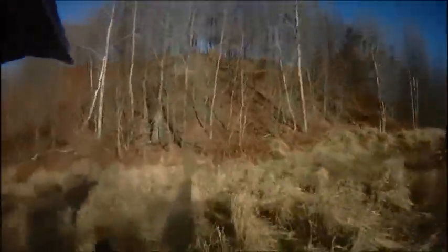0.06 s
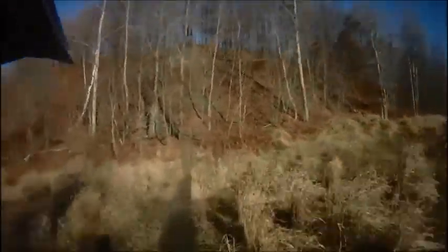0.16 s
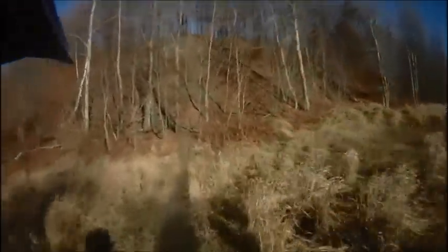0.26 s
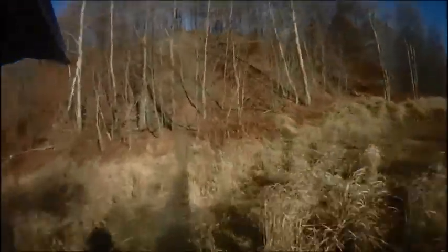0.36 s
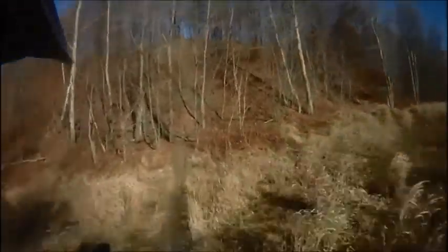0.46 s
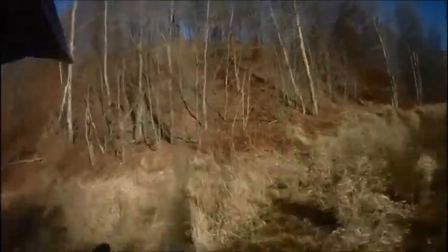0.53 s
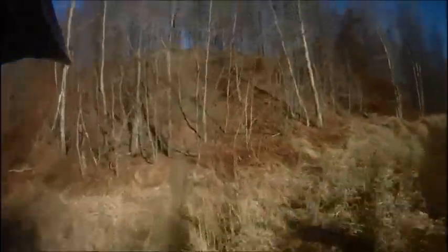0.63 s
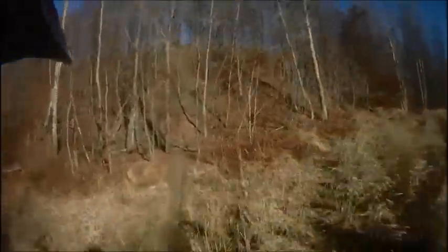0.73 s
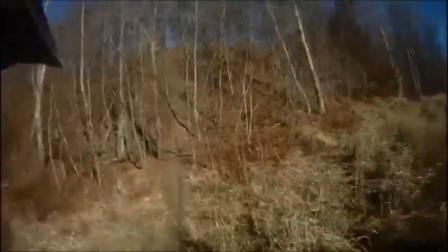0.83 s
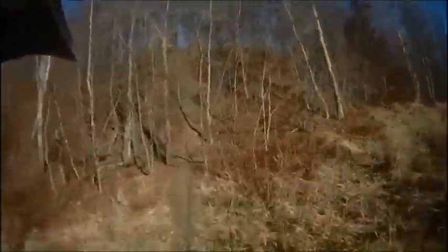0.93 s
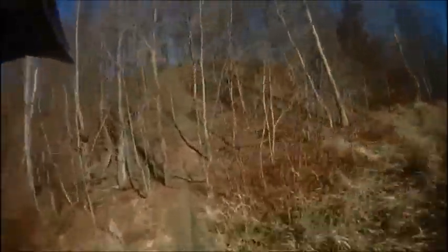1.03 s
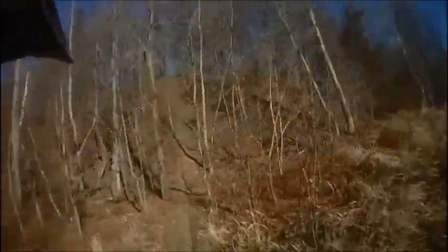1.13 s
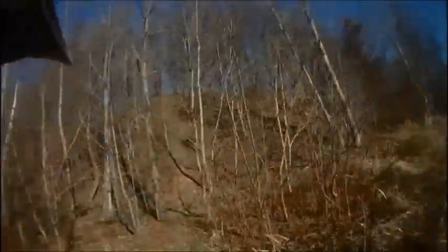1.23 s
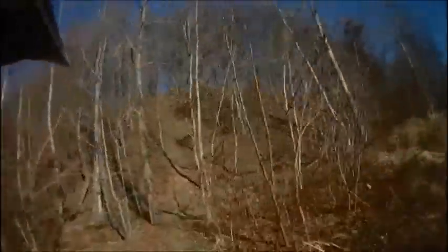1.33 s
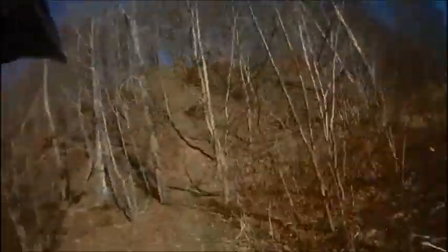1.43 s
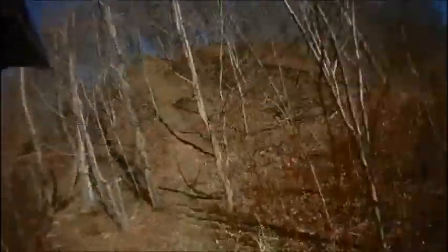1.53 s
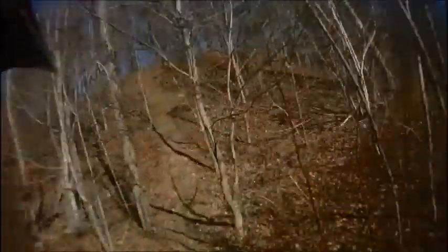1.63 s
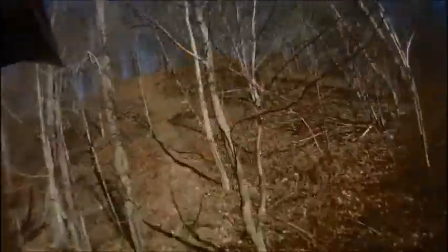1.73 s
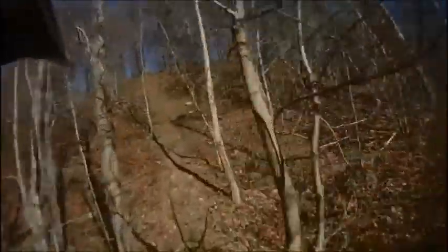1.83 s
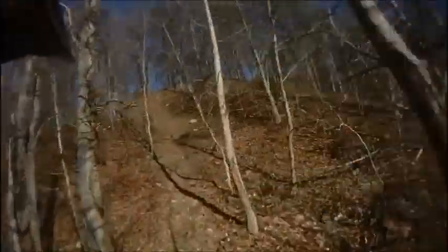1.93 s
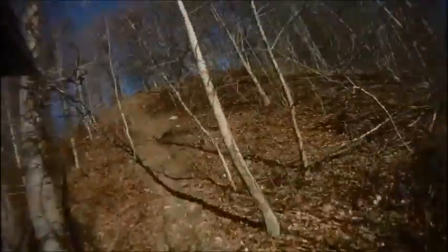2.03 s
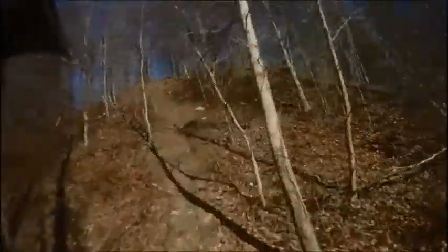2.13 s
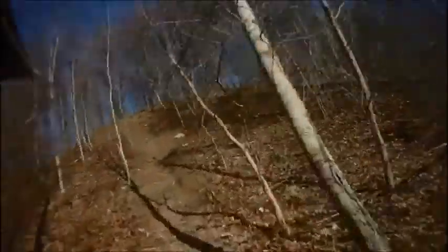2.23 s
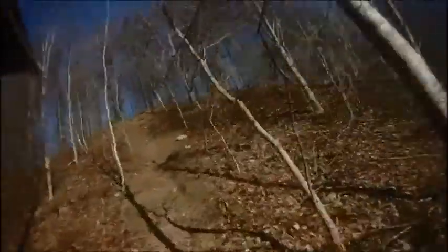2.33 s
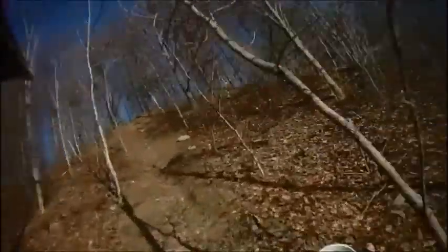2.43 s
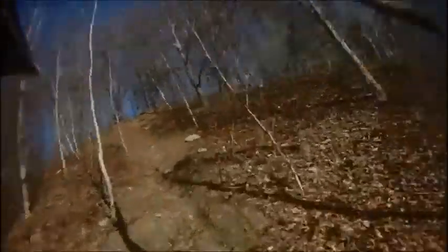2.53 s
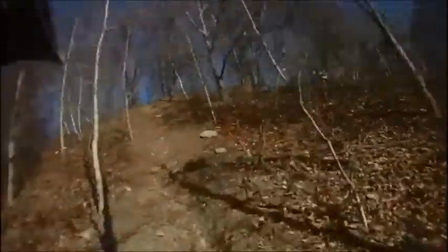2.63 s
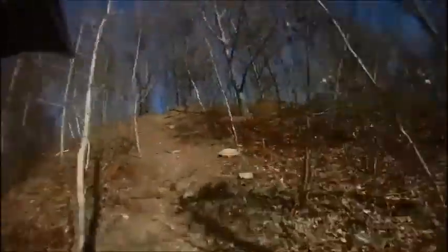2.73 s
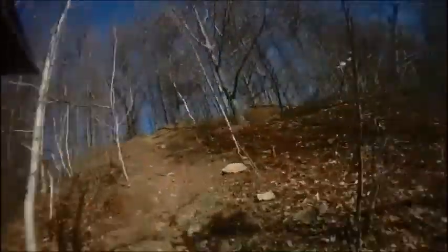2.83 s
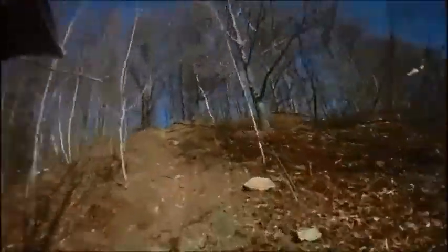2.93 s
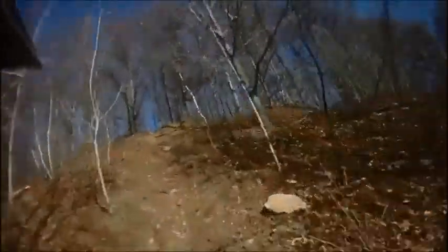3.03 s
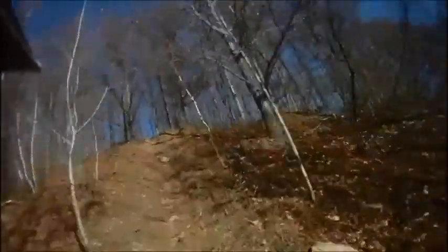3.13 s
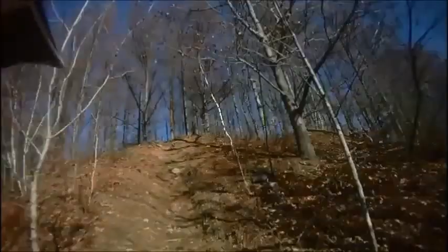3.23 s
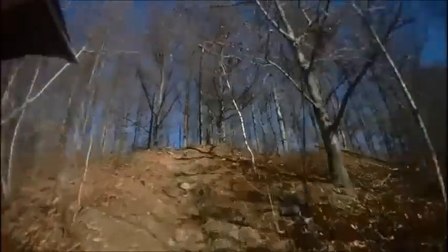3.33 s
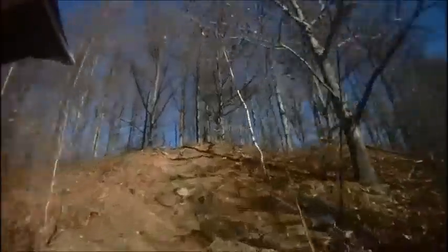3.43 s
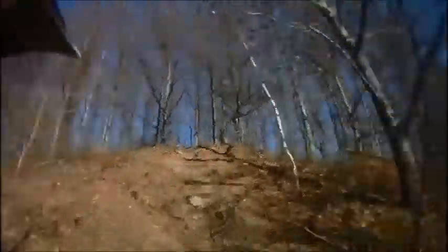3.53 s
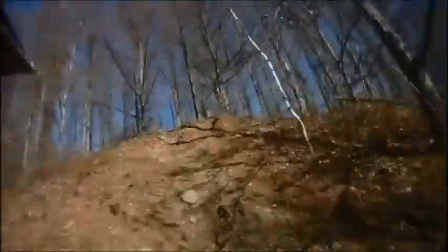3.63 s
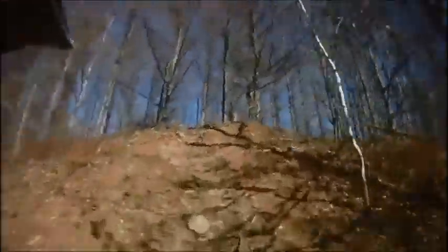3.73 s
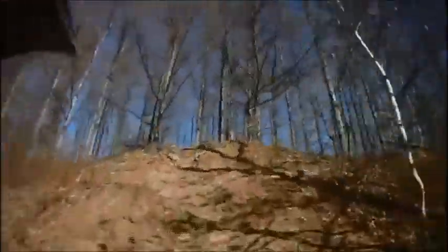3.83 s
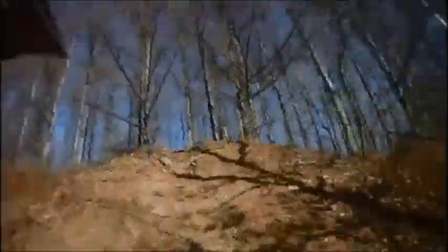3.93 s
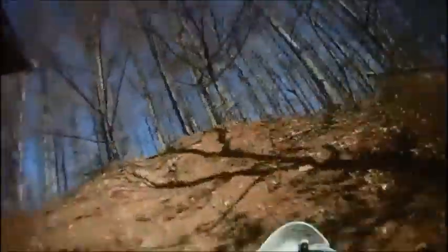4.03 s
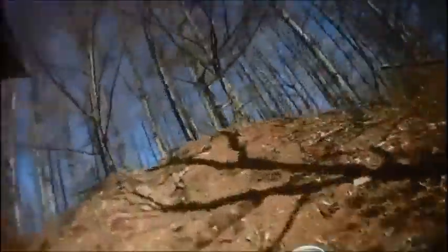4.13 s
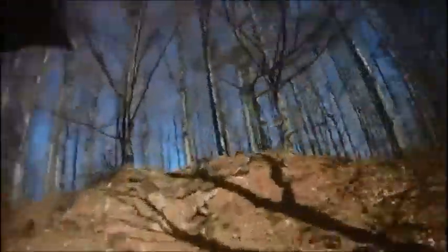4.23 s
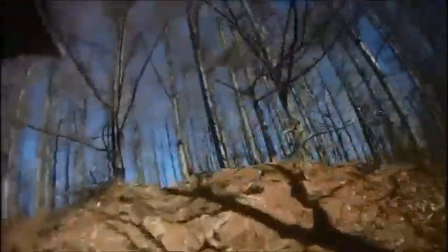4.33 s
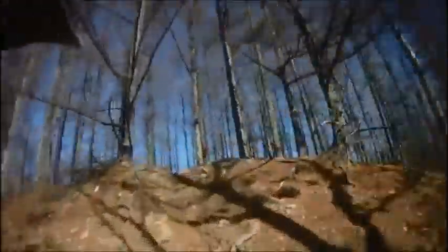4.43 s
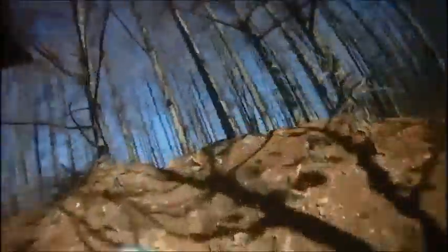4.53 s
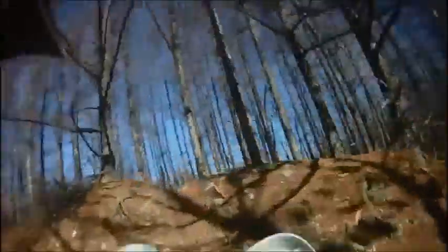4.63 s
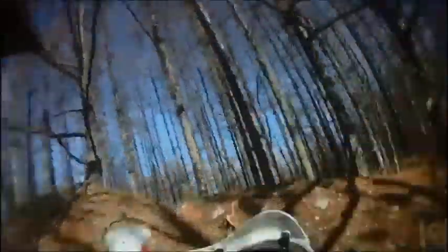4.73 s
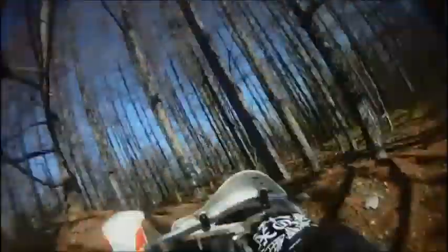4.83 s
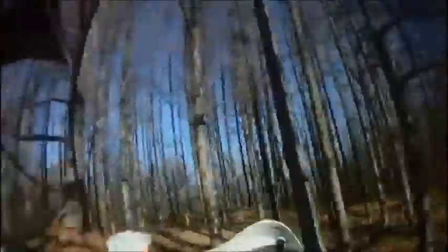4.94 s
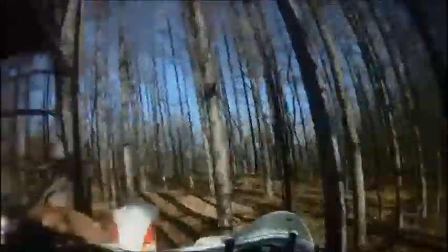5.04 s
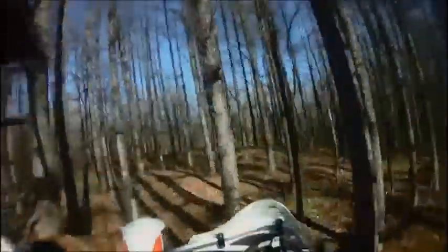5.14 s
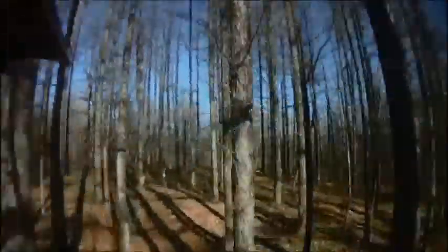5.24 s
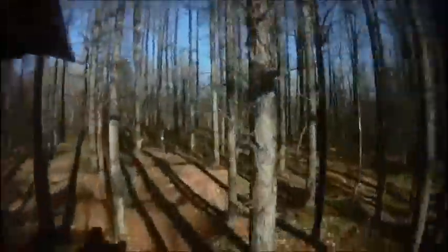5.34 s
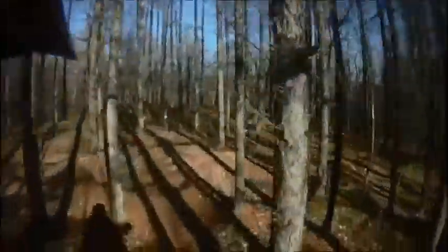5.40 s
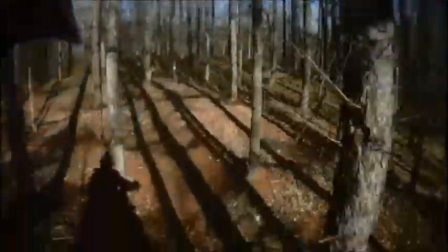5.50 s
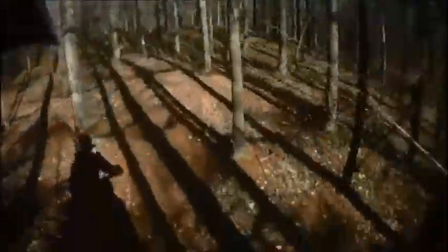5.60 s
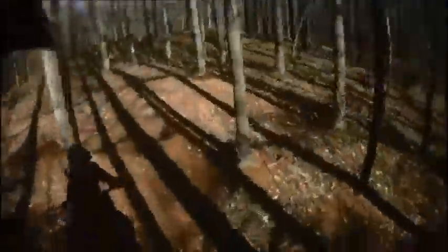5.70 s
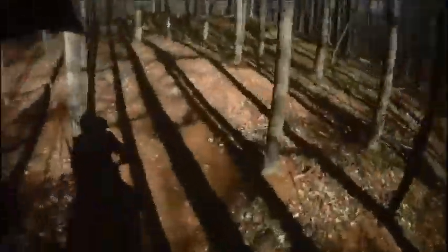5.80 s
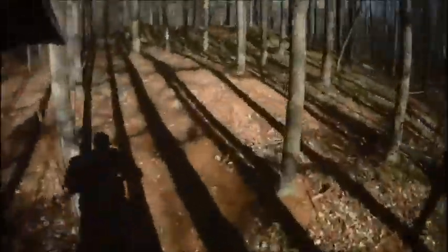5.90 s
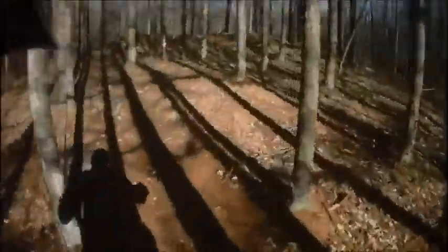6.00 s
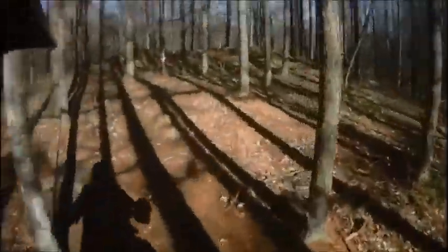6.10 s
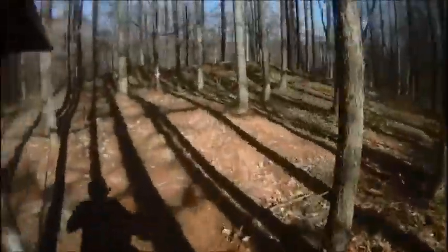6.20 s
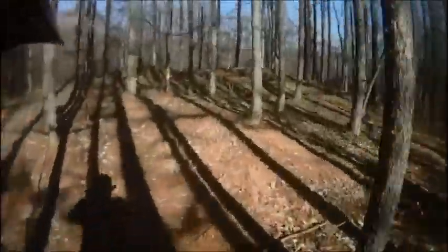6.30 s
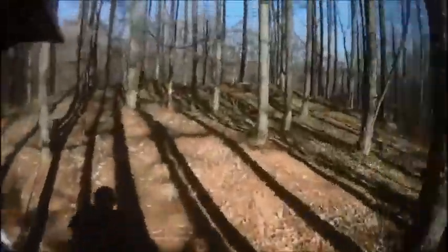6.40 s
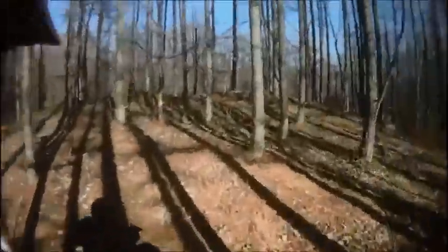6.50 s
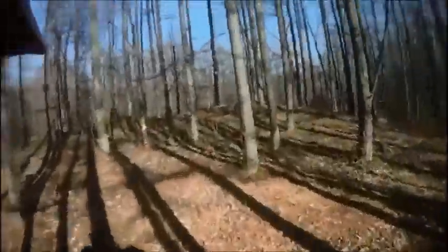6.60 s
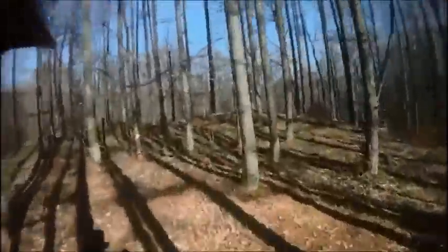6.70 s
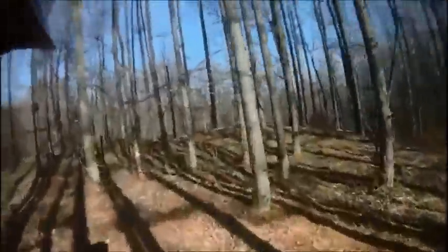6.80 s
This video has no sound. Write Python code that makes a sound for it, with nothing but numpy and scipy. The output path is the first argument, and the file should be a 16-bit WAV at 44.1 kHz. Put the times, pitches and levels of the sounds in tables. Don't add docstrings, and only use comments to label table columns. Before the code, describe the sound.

A small two-stroke trail bike barks and surges up a wooded hill, sputtering off throttle, then drops to a lumpy idle with sharp ticks.

```python
import sys
import numpy as np
from scipy import signal
from scipy.fft import rfft, irfft
from scipy.io import wavfile
from scipy.ndimage import uniform_filter1d

SR = 44100
rng = np.random.default_rng(int(sys.argv[2]) if len(sys.argv) > 2 else 0)


def convert_level_to_amplitude(level_db):
    exponent = np.asarray(level_db, float) / 20
    return 10 ** exponent


def master_out(mix):
    frames = np.transpose(np.atleast_2d(mix))
    ceiling = np.clip(frames, -1, 1)
    pcm = np.round(ceiling * 32767).astype(np.int16)
    wavfile.write(sys.argv[1], SR, pcm)


N = 302522

STALL_S = 4.92
STEADY_MISFIRE = .18

# time_s, effort_db, load_db, pipe_hz, ground_echo_share
THROTTLE = [(0, -21.5, -29.5, 617, 0.93), (.25, -16.5, -31, 510, 0.45), (.56, -15, -29.5, 525, 0.52),
            (.7, -23.5, -26.5, 503, 0.25), (1.0, -16.5, -18, 520, 0.48), (1.18, -18, -26.5, 526, 0.56),
            (1.27, -20, -22.5, 480, 0.41), (1.5, -16.5, -21, 535, 0.41), (1.8, -19, -20.5, 530, 0.43),
            (2.25, -16, -19.5, 507, 0.25), (2.45, -16, -18.5, 547, 0.058), (2.68, -18, -22.5, 482, 0.25),
            (2.88, -16.5, -23.5, 568, 0.054), (3.3, -18, -23, 490, 0.13), (3.72, -14.5, -31, 488, 0.46),
            (4.08, -14.5, -29, 524, 0.3), (4.35, -15.5, -32.5, 490, 0.47), (4.9, -19, -28.5, 567, 0.47)]
SURE_FIRINGS_S = [.918, 1.17, 1.9555, 2.071, 3.6, 4.311, 4.589]
PIPE_SAG_HZ = 35.6


def pulling():
    hz, surge, push = revs()
    pipe_semitones, bite_db, boom_db, hollow_db, hollow_semitones, edge_db, port_semitones, port_db = push
    ragged = misfire()
    effort_db, load_db, pipe_hz, ground = columns(THROTTLE)
    pipe_hz = pipe_hz * 2 ** (pipe_semitones / 12) - PIPE_SAG_HZ * surge
    can_db, bark_db, knock_db, crack_db = engine_levels(effort_db, load_db, hz, surge, bite_db, boom_db, ragged)
    shut = 1 - .55 * ragged
    pulses, turns, strength = firings(hz, 0.2 + 2.4 * ragged, SURE_FIRINGS_S)
    bounce = np.clip(ground, 0, .6) * np.roll(pulses, round(0.004364 * SR))
    puff = 1.15 * puffs(turns, strength, .8, 1.0)
    near = -jittered(pulses, spread_s=.00004)
    low = exhaust(pulses + bounce, puff, ragged, shut, pipe_hz, can_db, bark_db)
    low += (convert_level_to_amplitude(hollow_db) - 1) * resonate(low, 341 * 2 ** (hollow_semitones / 12), 167)
    low += (convert_level_to_amplitude(edge_db) - 1) * resonate(low, np.full(N, 860), 170)
    low = np.roll(low, round(.0042 * SR))
    knock = port_edge(near, turns, strength, ragged, knock_db, port_semitones, port_db)
    crack = fins(near, turns, strength, ragged, shut, crack_db)
    on = np.clip((STALL_S - np.arange(N) / SR) / 0.039, 0, 1) ** 1.1
    return on * (low + knock + crack)


# freq_hz, level_db
CAN = [(41, -35), (70, -29), (102, -22), (167, -15), (220, 0.5), (236, 5.5), (310, 4), (400, -53.5),
       (680, -120)]
# freq_hz, level_db
BARK = [(180, -27.5), (300, 0), (344, 17.5), (382, 12.5), (460, 16.5), (499, 14), (566, 19), (700, 9.5),
        (877, 0.5), (1000, -36.5), (1300, -22), (2200, -120)]


def exhaust(pulses, puff, ragged, shut, pipe_hz, can_db, bark_db):
    clean = np.sqrt(1 - ragged ** 2)
    can = clean * colour(pulses, CAN) + ragged * colour(puff, CAN)
    bark = clean * colour(-pulses, BARK, lean=-.9) + ragged * colour(puff, BARK)
    bark = levelled(0.9 * bark + resonate(resonate(bark, pipe_hz, 164), pipe_hz, 162))
    bark = levelled(scattered(bark, .04, share=.3))
    return convert_level_to_amplitude(can_db) * can + convert_level_to_amplitude(bark_db) * bark * shut


# freq_hz, level_db
KNOCK = [(500, -8), (850, 4.5), (885, -2), (947, 7), (1050, 4.5), (1220, 3), (1520, 6.5), (1640, 2.5),
         (1900, -2), (2470, 0), (4180, -120)]


def port_edge(near, turns, strength, ragged, knock_db, port_semitones, port_db):
    clean = np.sqrt(1 - ragged ** 2)
    echo = np.roll(near, round(0.00247 * SR))
    knock = clean * levelled(colour(scattered(near + 0.1 * echo, 0.04, .8), KNOCK))
    header_hz = 1015 * 2 ** (port_semitones / 12)
    knock += convert_level_to_amplitude(port_db) * .8 * resonate(knock, header_hz, 230)
    knock *= .7 * np.clip((knock_db + 46) / 16, .3, 1)
    breath = .3 + .4 * ragged + .012 * np.maximum(-28 - knock_db, 0)
    knock += breath * colour(puffs(turns, strength, .6, 2.5), KNOCK)
    return convert_level_to_amplitude(knock_db) * knock


# freq_hz, level_db
CRACK = [(1000, -121), (1700, 7.5), (1960, 12), (2270, 16), (3430, 12.5), (3850, 13.5), (5200, -6),
         (6760, -41), (11400, -120)]
# freq_hz, level_db
FIZZ = [(2650, -32.5), (4500, 1), (4910, -5.5), (5280, -5.5), (6360, -2.5), (6740, -6), (7710, -10.5),
        (8460, -6.5), (9780, -16.5), (11200, -13.5), (12400, -21), (14700, -21.5), (15500, -26)]


def fins(near, turns, strength, ragged, shut, crack_db):
    clean = np.sqrt(1 - ragged ** 2)
    load = np.clip((crack_db + 42) / 18, .15, 1)
    crack = .9 * load * clean * levelled(colour(scattered(near, .04, 1.5), CRACK))
    crack += .66 * shut * colour(puffs(turns, strength, 1.6 - .8 * load + ragged, 5.0), CRACK)
    fizz = shut * colour(puffs(turns, strength, 0.59 + 0.5 * ragged, 8.8), FIZZ)
    fizz_db = 1.376 * crack_db + 0.5
    return convert_level_to_amplitude(crack_db) * crack + convert_level_to_amplitude(fizz_db) * fizz


# start_s, from_hz, end_s, to_hz
PUSHES = [(0, 78.3, .53, 94), (.6, 102.6, .66, 105.2), (.73, 103.6, .86, 89), (.925, 89.5, 1.035, 105),
          (1.15, 90.5, 1.27, 109.5), (1.36, 119, 1.425, 116), (1.51, 102.5, 1.7, 109.5),
          (1.765, 110, 1.835, 120.3), (1.945, 122.3, 2.005, 117), (2.085, 102, 2.2, 116),
          (2.3, 118, 2.38, 117.5), (2.45, 108.5, 2.495, 117.5), (2.545, 110, 2.64, 115),
          (2.775, 130, 2.81, 130.5), (2.86, 115.3, 3.09, 113), (3.145, 104.5, 3.22, 115.5),
          (3.31, 118.5, 3.4, 137), (3.49, 110.8, 3.58, 103.5), (3.705, 88, 3.85, 104),
          (3.922, 94.5, 3.976, 105.5), (4.02, 95, 4.175, 81), (4.315, 92.5, 4.405, 105.6),
          (4.495, 95.6, 4.555, 74), (4.64, 95, 4.725, 74.5)]
PIPE_SEMITONES = [(1, 2.5), (2, 1), (0.5, 4), (3.2, 0), (0, 1.2), (1, 2), (-0.8, 1.8), (1, 0.1), (1, 0.5),
                  (0.6, 0.3), (-0.7, 2.5), (-2, 5), (0.5, 1.5), (3, -1), (0.8, 0), (.3, 2), (4, 2),
                  (1.5, 1.9), (2.5, 3), (1.9, 1.5), (2, 2), (0, 3.5), (3, -1.5), (2.5, 0.4)]
BITE_DB = [3.1, 2.5, 1, -6, 0, -1.6, -2.5, -2.5, -3.1, -2.5, -4, -3, -1, -4, -0.5, -1.5, -4, 3, 1.5, 2.5,
           1.5, 5, 2, 2.1]
BOOM_DB = [8, 0, 4, 0, -3.5, -7, 0.1, -6.5, -5.5, -3.5, -6.5, -0.5, -5.5, -5, -5, 0, -2.5, -6.5, 2, -4.5, 8,
           2.5, 5, 9]
HOLLOW_DB = [-3.5, 0, 2.5, -4.5, 5.5, 0.5, -4.5, 3, -4, -6.5, -0.5, -2.5, 0.5, -5, -2.5, -8, -21, 2, -8, -7,
             -6, -6, 3.5, 0]
HOLLOW_SEMITONES = [0.076, 0.12, 0, 0.12, 0.51, 0.13, 0, 0, 0.22, 1, 0, 0, 0, 0.3, 0, 0, 0, 0.18, 1.4, 2,
                    2.1, 0, 0.25, 0.48]
EDGE_DB = [-8, 0, 7, 0.5, -1, -17, 5.5, -2, 0, 1, -10, -7, 2.5, 0, 4.5, 8.5, -8, 1, -1.5, -3, 0, -4, 5, 3.5]
PORT_SEMITONES = [0.3, -0.31, 0.091, 0, -0.6, 0.8, 0, -0.52, -0.23, 0, 0.96, 0.058, 0.41, 0.33, 0.076,
                  -0.14, 0.21, 0, 0.15, 0.079, 0, 0.5, 0.13, 0.1]
PORT_DB = [-4, 8, -10, -8, 8.5, 4, -1.5, 8.5, 1.5, 3, 7, -4, 1, 9, -11, 1.5, 9, -2, 3, -2, -1, 6, -1, -13]
LAST_S, LAST_HZ, STALL_HZ = 4.82, 82, 68
SURGE_HZ_PER_S = 150
FLUTTER = .004


def revs():
    colours = np.transpose([BITE_DB, BOOM_DB, HOLLOW_DB, HOLLOW_SEMITONES, EDGE_DB, PORT_SEMITONES, PORT_DB])
    rows = []
    for (start_s, from_hz, end_s, to_hz), (from_st, to_st), shade in zip(PUSHES, PIPE_SEMITONES, colours):
        rows.append((start_s, from_hz, from_st, *shade))
        rows.append((end_s, to_hz, to_st, *shade))
    plain = np.zeros(len(rows[0]) - 2)
    rows += [(LAST_S, LAST_HZ, *plain), (STALL_S, STALL_HZ, *plain)]
    hz, *push = columns(rows)
    hz = uniform_filter1d(hz, size=1000)
    surge = np.tanh(uniform_filter1d(np.gradient(hz) * SR, size=1500) / SURGE_HZ_PER_S)
    shake = uniform_filter1d(uniform_filter1d(rng.standard_normal(N), size=1200), size=1200)
    flutter = evened(shake - uniform_filter1d(shake, size=6000))
    return hz * (1 + FLUTTER * flutter), surge, push


# start_s, end_s, misfire_0_to_1
MISFIRE = [
    (.73, .914, .85),
    (1.032, 1.135, .85),
    (1.12, 1.165, .65),
    (1.97, 2.069, .92),
    (0, .16, .36),
    (1.42, 1.5, .4),
    (2.47, 2.55, .35),
    (3.415, 3.594, .85),
    (4.505, 4.565, .6),
    (4.825, 5, .9),
]
FAIL_S, CATCH_S = .035, .004


def misfire():
    t = np.arange(N) / SR
    shut = []
    for start_s, end_s, depth in MISFIRE:
        failing = (t - start_s) / FAIL_S
        catching = 1 - (t - end_s) / CATCH_S
        shut.append(depth * np.clip(np.minimum(failing, catching), 0, 1))
    return np.maximum(np.max(shut, axis=0), STEADY_MISFIRE)


CRUISE_HZ, BARK_TOP_HZ = 105, 116.5


def engine_levels(effort_db, load_db, hz, surge, bite_db, boom_db, ragged):
    def shade(offset_db, db_per_hz, surge_db, misfire_db):
        steady = offset_db + db_per_hz * (hz - CRUISE_HZ)
        return steady + surge_db * surge + misfire_db * (ragged - STEADY_MISFIRE)

    outrun_db = -0.5049 * np.maximum(hz - BARK_TOP_HZ, 0)
    can_db = effort_db + boom_db + shade(-7.5, 0.5544, 0, -3)
    bark_db = effort_db + outrun_db + 0.19 * bite_db - 0.12 * boom_db + shade(2.5, 0.1267, 2, -7.5)
    knock_db = -24 + 1.34 * (load_db + 24.5) + 1.63 * bite_db + shade(-5, 0.19, 1.5, -14)
    crack_db = load_db + bite_db + shade(-1.4, 0.2011, -0.05, -6)
    return can_db, bark_db, knock_db, crack_db


# start_s, peak_db, ring_hz, crack_rel_db
POPS = [(5.127, -34, 467, -38), (5.279, -58, 431, -11), (5.643, -27, 410, -24), (5.8, -26.5, 397, -20.5),
        (5.971, -38, 395, -19), (6.145, -28.5, 487, -20), (6.255, -49, 447, -22), (6.301, -41, 400, -30),
        (6.351, -30.5, 440, -37), (6.506, -36, 610, -30), (6.531, -33, 507, -36), (6.557, -30, 522, -25),
        (6.579, -22, 543, -24), (6.606, -27, 495, -26), (6.63, -26, 473, -24), (6.661, -26, 488, -41),
        (6.687, -19, 520, -32), (6.716, -25, 553, -47), (6.744, -19, 496, -30), (6.796, -29, 285, -41),
        (6.84, -26.5, 496, -49)]
# start_s, peak_db, ring_hz, crack_rel_db
CATCHES = [(0.776, -13, 530, -25), (0.787, -9, 484, -13), (0.819, -11, 574, -14), (0.829, -10, 474, -15),
           (0.84, -13, 475, -21), (0.856, -19, 447, -14), (0.863, -10.5, 565, -25), (0.872, -12, 446, -16),
           (0.892, -12, 424, -21), (0.906, -12, 480, -13), (1.172, -17, 462, -6), (2.018, -17, 520, -3),
           (2.025, -11.5, 510, -3), (2.034, -15, 483, 0.5), (2.047, -14, 477, -12), (2.062, -11, 300, -5),
           (2.072, -13, 510, -2), (3.443, -12, 537, -9.5), (3.451, -11, 526, -3), (3.457, -15, 505, -5),
           (3.471, -30, 547, -14), (3.513, -17, 580, -6), (3.523, -12, 520, -3.5), (3.532, -15, 500, -3.5),
           (3.561, -9.5, 560, -12), (3.57, -13, 540, -4.5), (3.579, -21, 540, -2), (3.59, -24, 566, 1),
           (3.599, -19, 584, -4)]


def pops():
    out, burst, t = np.zeros(N), np.zeros(N), np.arange(2000) / SR
    for start_s, peak_db, hz, crack_db in POPS:
        pipe = ring(hz, 0.019, 0.0061) + 0.17 * ring(1.3 * hz, 0.1, 0.0028)
        add(out, start_s, convert_level_to_amplitude(peak_db) * (pipe + 0.063 * ring(224, 0.052, 0.0057)))
        add(out, start_s, convert_level_to_amplitude(peak_db - 11.0) * ring(254, 0.063, 0.01))
        add(burst, start_s - .008, convert_level_to_amplitude(peak_db + crack_db + 1.0) * np.hanning(900))
    for start_s, peak_db, hz, crack_db in CATCHES:
        add(out, start_s, convert_level_to_amplitude(peak_db) * swell(hz, 0.00339, 0.0021, 0.0017))
        add(out, start_s, convert_level_to_amplitude(peak_db - 20.0) * ring(200, 0.05, 0.0033))
        add(burst, start_s, convert_level_to_amplitude(peak_db + crack_db - 3 - 60 * t / .02))
    noise = rng.standard_normal(N)
    noise[[round(row[0] * SR) for row in CATCHES]] = -9
    return out + burst * (colour(noise, CRACK) + 0.61 * colour(noise, KNOCK) + 0.28 * colour(noise, FIZZ))


# time_s, pipe_db
COAST = [
    (4.86, -22.5),
    (5.02, -36),
    (5.5, -40),
    (5.93, -43.5),
    (6.58, -43.5),
    (6.75, -39.5),
    (6.86, -38),
]
# freq_hz, level_db
IDLE = [(53, -37), (90, -24.5), (254, -11.5), (293, -2.5), (330, -6.5), (416, 1), (456, -12.5), (479, -1),
        (717, -12), (1000, -30), (1300, -100), (2200, -120)]
# freq_hz, level_db
RATTLE = [(530, 15), (900, 2.5), (1130, -3), (1230, -0.5), (1470, -1.5), (1880, -3), (2770, 7.5),
          (3080, -1.5), (4000, 1), (5340, -13.5), (6710, -5.5), (9810, -22.5), (14000, -22)]
IDLE_HZ, RATTLE_DB, RATTLE_START_DB, SETTLE_S, RATTLE_PER_DB = 35.76, -10, 3, 0.031, 1.13


def coasting():
    pipe_db = columns(COAST)[0]
    since_s = np.arange(N) / SR - COAST[0][0]
    settling = np.exp(-np.maximum(since_s, 0) / SETTLE_S)
    rattle_db = -39.5 + RATTLE_PER_DB * (pipe_db + 39.5) + RATTLE_DB + RATTLE_START_DB * settling
    wobble = evened(uniform_filter1d(rng.standard_normal(N), size=1500))
    _, turns, strength = firings(IDLE_HZ * convert_level_to_amplitude(1.6 * wobble), 1.8)
    pipe = colour(puffs(turns, strength, 1.0, 3.2), IDLE)
    rattle = colour(puffs(turns, strength, 0.92, 4.7), RATTLE)
    on = np.clip(since_s / 0.12, 0, 1)
    return on * (convert_level_to_amplitude(pipe_db) * pipe + convert_level_to_amplitude(rattle_db) * rattle)


# start_s, peak_db
JOLTS = [(0.38, -32.5), (0.437, -32), (0.459, -30.5), (0.5, -34), (0.528, -33), (3.641, -32.5),
         (3.772, -31.5), (3.913, -31), (4.001, -30), (4.015, -30), (4.51, -38), (4.5852, -32), (4.69, -42),
         (4.712, -37)]


def jolts():
    burst = np.zeros(N)
    for start_s, peak_db in JOLTS:
        add(burst, start_s, convert_level_to_amplitude(peak_db + 9.5 - 60 * np.arange(3000) / SR / 0.032))
    return burst * colour(rng.standard_normal(N), KNOCK)


# start_s, peak_db, pitch_hz
TICKS = [(4.938, -24, 5200), (4.9612, -13, 2760), (4.9723, -21, 2800), (5.004, -27, 3530),
         (5.021, -27, 2500), (5.2626, -20, 3620), (5.2799, -10.5, 3300), (5.2871, -47, 3100),
         (5.314, -22, 8200), (5.345, -30, 7450), (5.467, -28, 8800), (5.4894, -27, 5500), (5.509, -9, 8600),
         (5.5568, -22, 6700), (5.5637, -28, 7000), (5.5702, -15.5, 5450), (5.58, -22.5, 8200),
         (5.5864, -39, 2900), (5.635, -30, 5460), (5.644, -35, 5200), (5.6873, -30, 5900),
         (5.699, -16, 3300), (5.708, -17.5, 9200), (5.8675, -34, 5100), (5.8785, -33, 5400),
         (5.886, -38, 5000), (5.905, -21.5, 5400), (5.915, -31, 5100), (6.017, -35.5, 2000),
         (6.05, -30, 3600), (4.857, -22, 5940), (4.8925, -38, 6000), (5.0205, -26, 10000),
         (5.033, -33, 4400), (5.0665, -31, 10000), (5.113, -42, 5100), (5.126, -41, 8000),
         (5.2735, -26, 10000), (5.2865, -33, 7500), (5.3245, -33, 7500), (5.3563, -30, 6940),
         (5.377, -38, 5500), (5.3855, -46, 10000), (5.411, -33, 6900), (5.535, -40, 5300),
         (5.575, -36, 5230), (5.5945, -36, 9000), (5.6105, -32, 3800), (5.63, -39, 5200),
         (5.7465, -38, 6000), (5.7956, -33, 7000), (5.8065, -42, 5160), (5.8125, -45, 5100),
         (5.8915, -41, 5200), (6.008, -43, 6800), (6.212, -39, 2500), (6.267, -45, 6440),
         (6.826, -38, 4500), (6.853, -25, 3540)]
# low_hz, high_hz, t60_s
SHELL = [
    (910, 3100, 0.062),
    (2500, 3400, 0.0042),
    (3900, 5900, 0.0089),
    (5230, 12600, 0.0049),
]
TWIG_RING_DB, TWIG_T60_S = -16, 0.009
OFF_PITCH_DB_PER_OCTAVE = -23


def ticks():
    out, t = np.zeros(N), np.arange(1000) / SR
    for start_s, peak_db, hz in TICKS:
        twig_db = peak_db + TWIG_RING_DB - 8.0 * np.log2(hz / 3000)
        add(out, start_s, convert_level_to_amplitude(twig_db) * ring(hz, TWIG_T60_S, 0.00035))
    for low_hz, high_hz, t60_s in SHELL:
        burst = np.zeros(N)
        shake = np.sign(rng.standard_normal(N))
        for start_s, peak_db, hz in TICKS:
            off_db = OFF_PITCH_DB_PER_OCTAVE * abs(np.log2(hz / np.sqrt(low_hz * high_hz)))
            add(burst, start_s, convert_level_to_amplitude(peak_db + off_db - 60 * t / t60_s) * (1 - np.exp(-t / 0.00041)))
            shake[round(start_s * SR):][:12] = 1.5 * np.sin(2 * np.pi * hz * t[:12])
        band = signal.butter(2, [low_hz, high_hz], "band", fs=SR)
        out += signal.lfilter(*band, burst * shake) * np.sqrt(SR / 2 / (high_hz - low_hz))
    return out


# time_s, level_db
WIND = [(0.0, -43), (.95, -38), (1.3, -44.5), (2.3, -38.5), (3.3, -42.5), (4.9, -44.5), (5.2, -54),
        (6.06, -60), (6.86, -57)]
# freq_hz, level_db
GUST = [(12, -55), (20, -20.5), (97, -4.5), (160, -4), (200, -4.5), (260, -3.5), (440, -120)]


def wind():
    lumps_db = 1.1 * evened(uniform_filter1d(rng.standard_normal(N), 2500))
    return convert_level_to_amplitude(columns(WIND)[0] + 4.5 + lumps_db) * colour(rng.standard_normal(N), GUST)


def firings(hz, scatter_db, sure_s=(0,)):
    turns = np.cumsum(hz) / SR + 1 - 1e-2
    marks = turns[np.round(np.multiply(sure_s, SR)).astype(int)]
    turns = turns + np.interp(np.arange(N) / SR, sure_s, np.round(marks) - marks)
    strength = convert_level_to_amplitude(scatter_db * np.interp(turns, np.arange(2000), rng.standard_normal(2000)))
    at = np.nonzero(np.diff(np.floor(turns)))[0] + 1
    pulses = np.zeros(N)
    pulses[at] = strength[at] / np.sqrt(hz[at])
    return pulses, turns, strength


def puffs(turns, strength, steady, sharp):
    opening = np.exp(sharp * (np.cos(2 * np.pi * (turns - .1)) - 1))
    return evened(strength * (steady + opening) * rng.standard_normal(N))


def jittered(pulses, spread_s):
    at, out = np.nonzero(pulses)[0], np.zeros(N)
    move, weight = rng.standard_normal((2, len(at)))
    moved = at + np.round(spread_s * SR * move).astype(int)
    out[np.clip(moved, 0, N - 1)] = pulses[at] * convert_level_to_amplitude(1.3 * weight)
    return out


def scattered(x, t60_s, share):
    t, angle = np.arange(800) / SR, 2 * np.pi * 1.9 * np.arange(N) / SR
    paths = rng.standard_normal((2, 800)) * convert_level_to_amplitude(-60 * t / t60_s)
    tones = rfft(paths, axis=1)
    paths = irfft(tones / np.sqrt(abs(tones) ** 1.5 + 1e-9), axis=1)
    a, b = (evened(signal.oaconvolve(x, path)[:N]) for path in paths)
    return evened(evened(x) + share * (np.cos(angle) * a + np.sin(angle) * b))


def resonate(x, hz, width_hz):
    turn = np.exp(2j * np.pi * np.cumsum(hz) / SR)
    r = np.exp(-np.pi * width_hz / SR)
    return 2 * (turn * signal.lfilter([1 - r], [1, -r], x / turn)).real


def colour(x, points, skirt_db=40, lean=1):
    f, db = np.transpose(points)
    octave = np.log2(np.fft.rfftfreq(8192, 1 / SR) + 1)
    outside = np.maximum(np.log2(f[0]) - octave, 0) + np.maximum(octave - np.log2(f[-1]), 0)
    gain_db = np.interp(octave, np.log2(f), db) - skirt_db * outside
    log_gain = np.log(convert_level_to_amplitude(np.maximum(gain_db, -100)))
    circle = np.concatenate([log_gain, log_gain[-2:0:-1]])
    phase = -lean * signal.hilbert(circle).imag
    taps = np.roll(np.fft.ifft(np.exp(circle + 1j * phase)).real, 2048)[:4096]
    return evened(signal.oaconvolve(x, taps)[2048:N + 2048])


def ring(hz, t60_s, rise_s):
    t = np.arange(3000) / SR
    wave = (1 - np.exp(-t / rise_s)) * convert_level_to_amplitude(-60 * t / t60_s) * np.sin(2 * np.pi * hz * t)
    return wave / abs(wave).max()


def swell(hz, peak_s, rise_s, fall_s):
    t = np.arange(900) / SR - peak_s
    return -np.exp(-(t / np.where(t < 0, rise_s, fall_s)) ** 2) * np.cos(2 * np.pi * hz * t)


def evened(x):
    return x / np.sqrt(np.mean(x ** 2) + 1e-20)


def levelled(x):
    return x / np.sqrt(uniform_filter1d(uniform_filter1d(x ** 2, size=2000), size=2000) + 1e-9)


def columns(rows):
    time_s, *values = np.transpose(rows)
    return [np.interp(np.arange(N) / SR, time_s, v) for v in values]


def add(mix, start_s, sound):
    part = mix[round(start_s * SR):][:len(sound)]
    part += sound[:len(part)]


def scene():
    return (pulling() + pops() + coasting() + jolts() + ticks() + wind())[None]


def low_pass(x):
    return signal.sosfilt(signal.butter(12, 16510, fs=SR, output="sos"), x)


def record(dry):
    held = dry / (1 + (abs(dry) / .8) ** 4) ** .25
    limited = signal.oaconvolve(held, signal.firwin(127, 15450, fs=SR)[None], "same")
    return low_pass(limited)


dry = scene()
out = record(dry)
master_out(out)
```